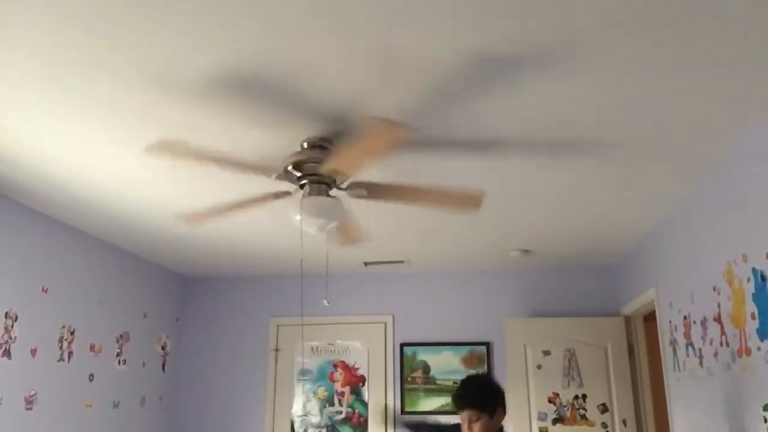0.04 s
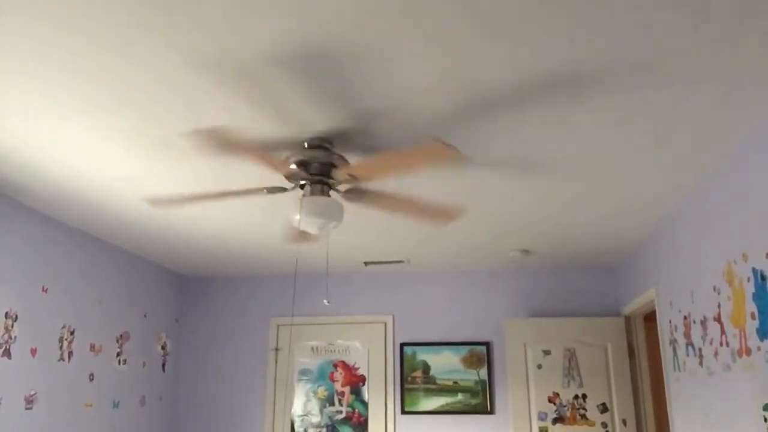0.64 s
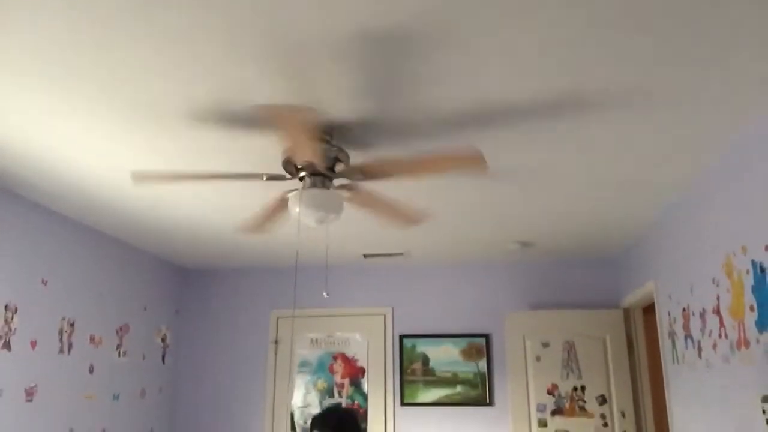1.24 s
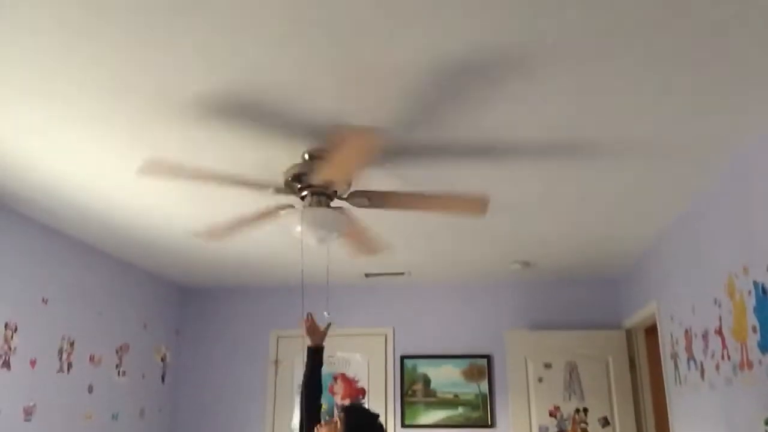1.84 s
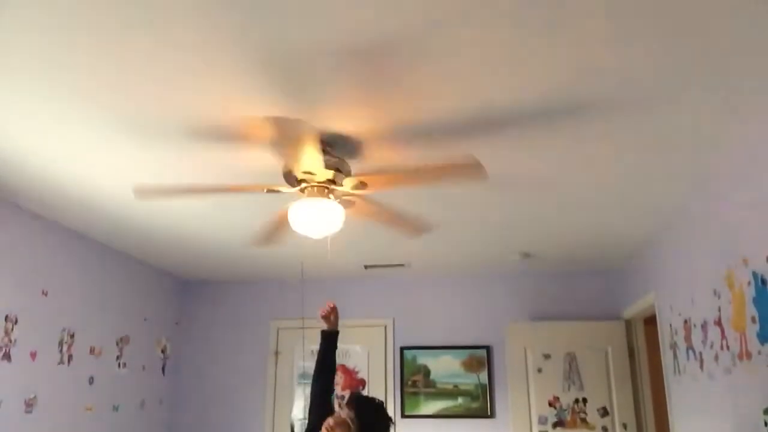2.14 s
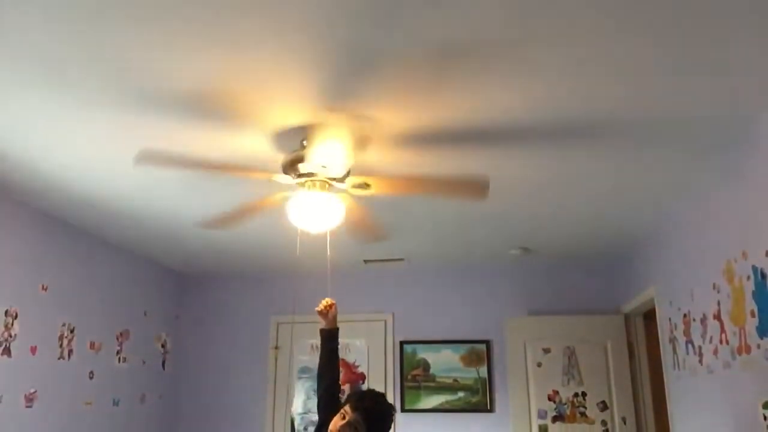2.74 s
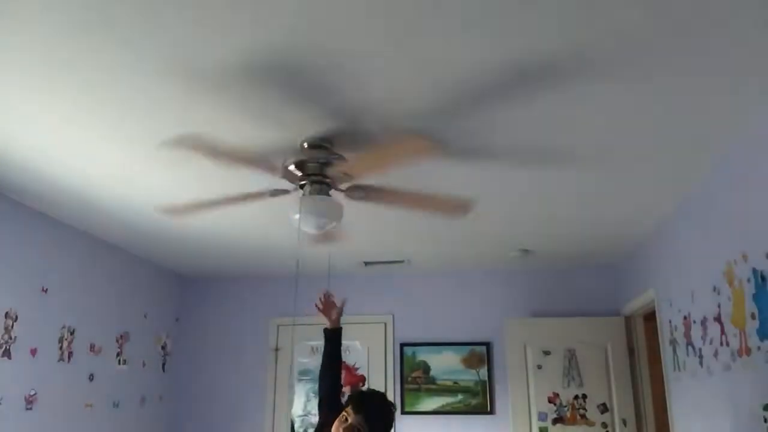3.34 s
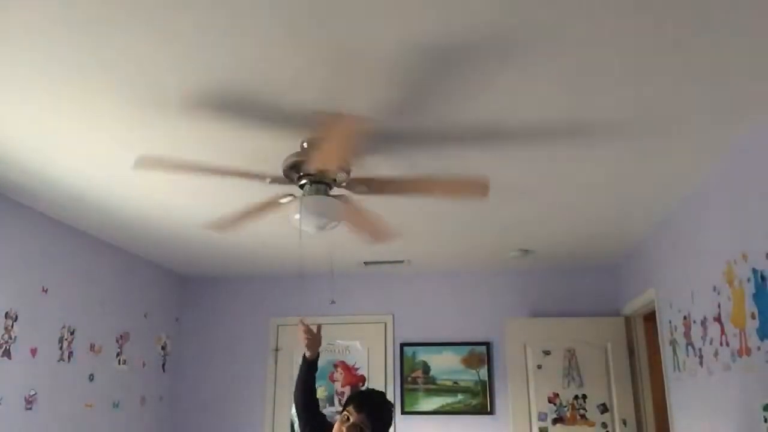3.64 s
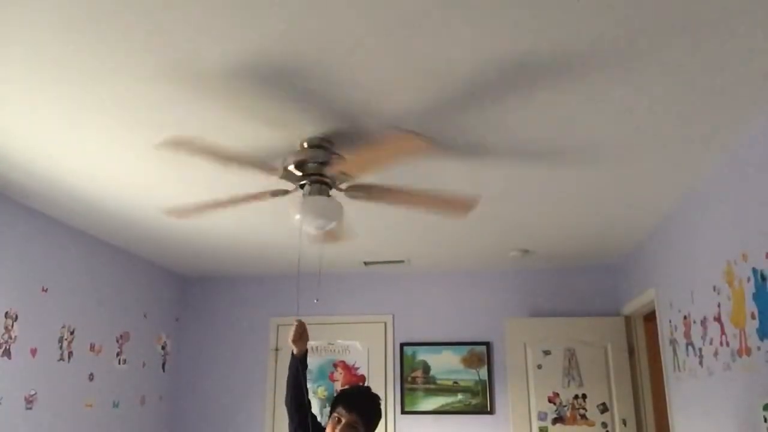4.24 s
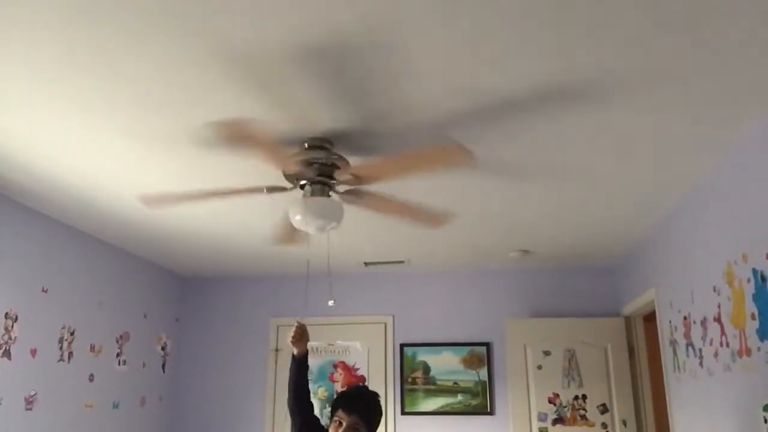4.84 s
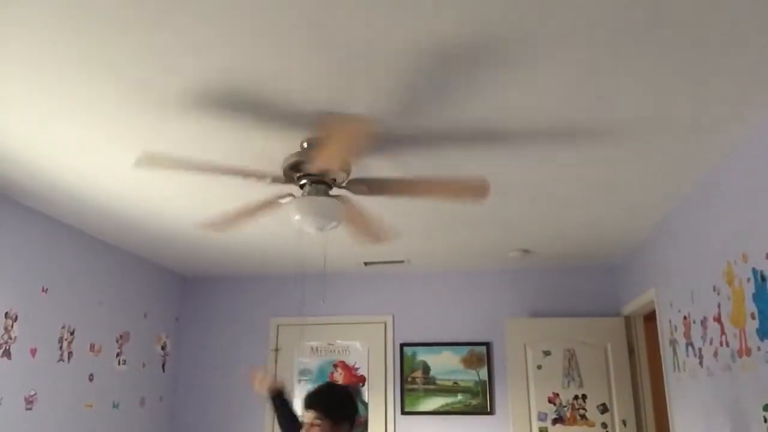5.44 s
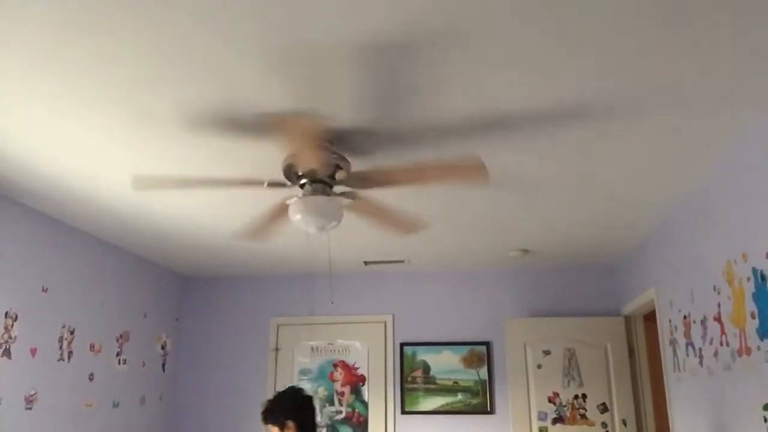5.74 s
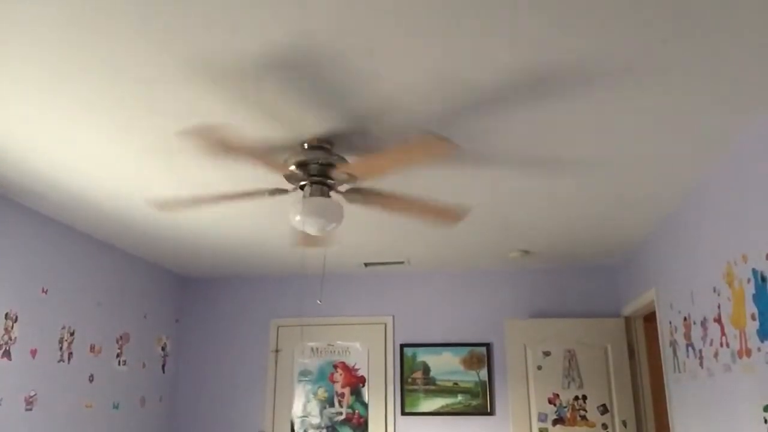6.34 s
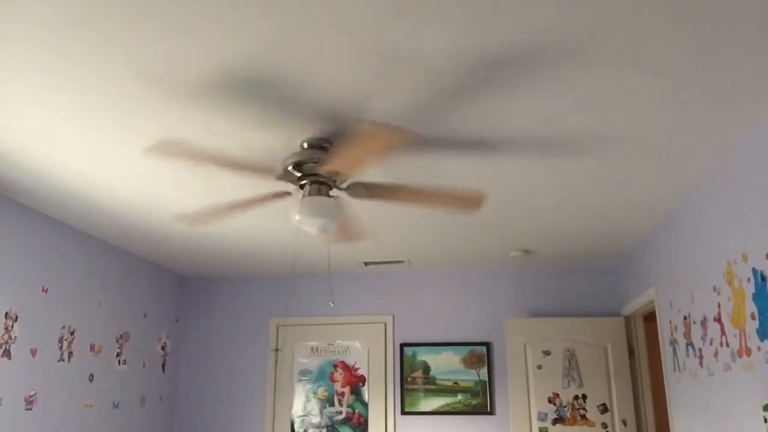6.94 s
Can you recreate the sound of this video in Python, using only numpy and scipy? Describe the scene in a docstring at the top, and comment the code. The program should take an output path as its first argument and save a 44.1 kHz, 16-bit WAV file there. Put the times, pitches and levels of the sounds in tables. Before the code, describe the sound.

Heavy footsteps thud, then a fan's bead chain jingles and its switch snaps repeatedly over a soft, steady rush of blades.

```python
"""A small bedroom with a ceiling fan turning. Someone steps down heavily, walks under it and tugs its
pull chains. The switches snap and ring the metal housing; the bead chains tick and jingle. Footfalls
thud in the floor, furniture is knocked and clothes rustle over the soft rush of the blades and the
motor hum. The microphone port rings near 8.5 kHz and gives every high sound the same glint."""
import sys
import numpy as np
from scipy import signal
from scipy.fft import rfft, irfft
from scipy.io import wavfile

SR = 44100
rng = np.random.default_rng(int(sys.argv[2]) if len(sys.argv) > 2 else 0)


def materialize(psi):
    """Save the field psi as 16-bit PCM at rate SR to the path in sys.argv[1].

    A 1-D psi becomes a single channel; in a 2-D psi each row is a channel.
    """
    bounded = np.clip(np.atleast_2d(psi).T, -1, 1)
    quanta = np.round(bounded * 32767).astype(np.int16)
    wavfile.write(sys.argv[1], SR, quanta)


N = 307804
TIME = np.arange(N) / SR
SHORT = TIME[:SR // 2]

# chain drawn tight, then a switch click; levels before gains:
# click_s, takeup_s, takeup_db, ping_db, crack_db, housing_db, canopy_db
CLICKS = [(2.218, .054, -59, -47, -45.5, -59, -47.5), (2.2466, 0.015, -48, -36, -35, -27.5, -35),
          (2.254, .005, -31.5, -40, -27, -46, -58), (2.439, 0.026, -57, -71, -58, -55, -56.5),
          (2.589, 0.057, -66, -39.5, -49.5, -48, -54), (2.976, 0.037, -60.5, -59, -54, -61, -78),
          (3.048, 0.04, -62, -24, -40.5, -35.5, -53.5), (3.192, .006, -54, -42, -48, -49, -62),
          (3.24, .01, -45, -18, -29, -38, -48.5), (3.396, .013, -38, -26, -29, -36.5, -56),
          (3.958, .055, -57, -28, -40.5, -34.5, -37.5), (4.089, 0.022, -42, -20, -38.5, -43, -45.5),
          (4.273, 0.031, -51.5, -61, -42, -57, -56.5), (4.29, .015, -60, -19, -26.5, -31, -57),
          (4.529, 0.016, -58.5, -31.5, -45.5, -49.5, -51.5), (4.644, 0.036, -42.5, -19, -33, -38.5, -43.5),
          (4.796, .005, -49.5, -43, -63, -40, -60), (4.845, .022, -44, -15, -26, -30.5, -47),
          (5.011, 0.0078, -49, -35, -45, -62, -44), (5.129, .054, -43.5, -21, -32, -37, -54),
          (5.271, 0.031, -43.5, -25.5, -30, -28.5, -49)]
# motor housing modes: pitch_hz, width_hz, gain_db
HOUSING_MODES = [(562, 196, -4.5), (743, 290, -8.5), (1403, 210, -6), (1667, 187, -1), (1915, 57, 3),
                 (2380, 300, -5), (2780, 180, 0.5), (2770, 78, -2), (3430, 590, -0.5), (3800, 460, 5),
                 (4680, 580, 7), (5370, 79, 6.5), (6520, 900, 2)]
# modes of the small metal parts of switch and chain: pitch_hz, width_hz, gain_db
FITTING_MODES = [(5760, 190, -21), (7090, 260, 4.5), (7740, 92, 7), (8100, 280, 4), (8766, 270, -0.5),
                 (8970, 157, 4.5), (11600, 470, -12)]


def from_db(db):
    return 10 ** (np.asarray(db) / 20)


def rms_one(x):
    return x / np.sqrt(np.mean(x ** 2) + 1e-20)


def energy_one(x):
    return x / np.sqrt(np.sum(x ** 2) + 1e-20)


def at_hz(points, hz):
    """Interpolate a table on a log-frequency axis."""
    known_hz, values = np.transpose(points)
    return np.interp(np.log(hz + 1e-9), np.log(known_hz), values)


def cut(x, hz, kind, order=2):
    """Causal low- or high-pass."""
    return signal.sosfilt(signal.butter(order, hz, kind, fs=SR, output="sos"), x + 1e-18)


def resonate(x, modes):
    """Parallel resonances with alternating signs."""
    out = 0
    for k, (hz, width_hz, db) in enumerate(modes):
        r = np.exp(-np.pi * width_hz / SR)
        poles = [1, -2 * r * np.cos(2 * np.pi * hz / SR), r * r]
        band = (1 - r * r) / 2 * signal.lfilter([1, 0, -1], poles, x + 1e-18)
        out = out + (-1) ** k * from_db(db) * band
    return out


def noise(spectrum):
    """Steady coloured noise, rms 1."""
    colour = from_db(at_hz(spectrum, np.fft.rfftfreq(N, 1 / SR)))
    return rms_one(irfft(rfft(rng.standard_normal(N)) * colour, N))


def drift(per_s):
    """Random wander, spread about 1."""
    return np.interp(TIME * per_s, np.arange(N), rng.standard_normal(N))


def add(out, start_s, sound):
    start = max(round(start_s * SR), 0)
    out[start:start + len(sound)] += sound[:max(N - start, 0)]


def movement(start_s, length_s, attack_s, release_s):
    """Envelope: linear attack, exponential release after length_s."""
    since_s = np.maximum(TIME - start_s, 0)
    return np.minimum(since_s / attack_s, 1) * np.exp(-np.clip((since_s - length_s) / release_s, 0, 20))


def grit(decay_s, rise_s=0.00019):
    """Rough contact: a noise burst that swells and dies."""
    burst = rng.standard_normal(len(SHORT)) * np.exp(-SHORT / decay_s)
    return burst * (1 - np.exp(-SHORT / rise_s)) ** 2


def push(peak_s):
    """Soft contact: one smooth hump of force."""
    return SHORT / peak_s * np.exp(-SHORT / peak_s)


def chatter(longest_s, stages=4, feedback=0.8):
    """Sharp blow, smeared by rebounds inside the mechanism (all-pass loops)."""
    blow = signal.unit_impulse(len(SHORT))
    for share in rng.uniform(.1, 1, stages):
        loop = np.r_[1, np.zeros(int(share * longest_s * SR)), feedback]
        blow = signal.lfilter(loop[::-1], loop, blow + 1e-18)
    return blow


def struck(blow, modes, spread_db, detune=0):
    """A blow excites each mode at a random strength; loose parts also shift in pitch. Energy 1."""
    draws = rng.standard_normal((len(modes), 2))
    varied = [(hz * (1 + detune * shift), width_hz, db + spread_db * strength)
              for (hz, width_hz, db), (strength, shift) in zip(modes, draws)]
    return energy_one(resonate(blow, varied))


def bedroom(x, wet_db, gap_s=.002, build_s=0.052, early_boost=0.67, early_s=0.0029):
    """Direct sound, strong echoes off the nearest surfaces, then a thickening tail; treble dies first."""
    # room decay: band_hz, t60_s
    decays = [(60, 0.42), (200, 0.41), (530, 0.4), (1400, 0.34), (3700, 0.23), (9000, 0.23), (16000, 0.11)]
    density = np.clip(.1 + (SHORT / build_s) ** 2, 0, 1)
    echoes = rng.standard_normal(len(SHORT)) * (rng.random(len(SHORT)) < density) / np.sqrt(density)
    echoes *= (SHORT > gap_s) * (1 + early_boost * np.exp(-SHORT / early_s))
    spectrum, hz = rfft(echoes), np.fft.rfftfreq(len(SHORT), 1 / SR)
    tail = 0
    for band_hz, t60_s in decays:
        share = at_hz([(f, f == band_hz) for f, _ in decays], hz)
        tail = tail + irfft(spectrum * share, len(SHORT)) * from_db(-60 * SHORT / t60_s)
    return x + from_db(wet_db) * signal.fftconvolve(x, energy_one(tail))[:len(x)]


def fan(air_db=-52.5, blades_per_s=12, swell=0.037, eddy_db=1):
    """Air rushes off the blades, swelling as each passes; the motor hums at mains multiples."""
    # blade rush spectrum: freq_hz, relative_db
    air_spectrum = [(22, -39), (50, 4.5), (90, 0), (120, -0.5), (200, -8), (300, -13.5), (480, -26.5),
                    (700, -28.5), (1000, -31.5), (1700, -34.5), (3000, -40.5), (8000, -41.5), (15000, -43)]
    # motor hum: pitch_hz, rms_db
    harmonics = [(60, -74), (120, -59.5), (180, -71.5)]
    passing = 1 + swell * np.sin(2 * np.pi * blades_per_s * TIME)
    air = noise(air_spectrum) * passing * from_db(air_db + eddy_db * drift(per_s=3.9))
    hum = sum(np.sqrt(2) * from_db(db) * np.sin(2 * np.pi * (hz * TIME + rng.random()))
              for hz, db in harmonics)
    return air + hum


def clothes(rub_gain_db=-5, swish_gain_db=-9, stir_db=-68, flutter_db=3):
    """Cloth rubs in small uneven slips, with a dry swish on top."""
    # brushes of cloth as the body moves: start_s, length_s, rub_db, swish_db
    brushes = [(0.03, 0.15, -55, -56.5), (0.116, 0.12, -45, -59.5), (0.232, 0.16, -46, -59),
               (0.327, 0.034, -52, -57), (0.518, 0.073, -56, -61), (0.592, 0.083, -54, -60),
               (0.763, 0.016, -49, -55), (0.992, 0.011, -50.5, -50.5), (1.02, 0.067, -68, -62.5),
               (1.169, 0.071, -58.5, -62), (1.32, 0.042, -59.5, -60.5), (1.579, .03, -65, -57.5),
               (5.714, 0.011, -83, -54), (6.01, 0.15, -65, -60), (6.206, 0.073, -56, -51),
               (6.29, 0.035, -45.5, -47), (6.524, 0.029, -51, -64), (6.645, 0.021, -80, -60),
               (6.785, 0.022, -66, -70)]
    # faint stirring while walking: start_s, length_s
    walks = [(0, 1.68), (5.698, 1.1)]
    # rub spectrum: freq_hz, relative_db
    rub_spectrum = [(200, 10), (450, 4), (800, 1.5), (1600, -3), (2600, -10), (4000, -12), (8000, -16),
                    (15000, -24)]
    # swish spectrum: freq_hz, relative_db
    swish_spectrum = [(1500, -59), (4500, -1.5), (8000, 8.5), (11000, -1.5), (15000, -10)]
    stir = sum(movement(start_s, length_s, attack_s=0.01, release_s=0.23) for start_s, length_s in walks)
    rubbing = swishing = from_db(stir_db) * stir
    for start_s, length_s, rub_db, swish_db in brushes:
        brush = movement(start_s, length_s, attack_s=0.47 * length_s, release_s=0.013)
        rubbing = np.hypot(rubbing, from_db(rub_db) * brush)
        swishing = np.hypot(swishing, from_db(swish_db) * brush)
    rub = noise(rub_spectrum) * rubbing * from_db(rub_gain_db)
    swish = noise(swish_spectrum) * swishing * from_db(swish_gain_db)
    return (rub + swish) * from_db(flutter_db * drift(per_s=120))


def furniture(tap_gain_db=22, ring_gain_db=28):
    """A dull tap on wood leaves a hollow ring."""
    # light knocks: start_s, tap_db, ring_db
    knocks = [(0.304, -45.5, -38), (0.335, -43, -34), (0.36, -54, -28.5), (0.434, -43, -47),
              (0.777, -49.5, -41), (0.995, -53.5, -70), (1.345, -66, -77), (6.316, -61, -58),
              (6.539, -53, -67)]
    # short-lived wood modes: pitch_hz, width_hz, gain_db
    tap_modes = [(506, 43, 0), (758, 43, 0), (1010, 140, -4.5), (1420, 380, -7), (1680, 280, -4),
                 (2540, 150, -5.5), (4450, 1800, -18)]
    # furniture body modes: pitch_hz, width_hz, gain_db
    ring_modes = [(335, 8, 0), (385, 20, -15), (535, 30, -13), (750, 25, -16)]
    out = np.zeros(N)
    for start_s, tap_db, ring_db in knocks:
        tap = bedroom(energy_one(resonate(grit(decay_s=0.0012), tap_modes)), wet_db=0.5)
        ring = energy_one(resonate(push(peak_s=0.00063), ring_modes))
        add(out, start_s, from_db(tap_db + tap_gain_db) * tap + from_db(ring_db + ring_gain_db) * ring)
    return out


def footsteps(boom_gain_db=28, knock_gain_db=25.5):
    """Each footfall heaves the whole floor and knocks its boards."""
    # footfalls and shifts of weight: start_s, boom_db, knock_db
    steps = [(0.171, -40, -33.5), (0.248, -39, -23), (0.31, -26.5, -24.5), (0.367, -19.5, -24.5),
             (0.411, -22.5, -39), (0.486, -31, -38), (0.571, -38, -37.5), (0.784, -39, -44),
             (0.826, -35, -53), (0.995, -36.5, -38), (1.061, -45.5, -64), (2.235, -40, -40.5),
             (3.199, -43, -48), (3.971, -46, -42), (4.101, -30, -42), (4.645, -35, -36),
             (5.041, -35.5, -35.5), (5.139, -32.5, -33.5), (5.209, -33.5, -43), (6.124, -31, -37),
             (6.146, -24.5, -40), (6.579, -43.5, -36), (6.956, -27.5, -31.5)]
    # board and whole-floor modes: pitch_hz, width_hz, gain_db
    board_modes = [(111.5, 22.7, -0.5), (169.6, 26, 0.5), (175.4, 17.7, 0.5), (220.7, 34.6, -11)]
    floor_modes = [(55, 30, 0), (88, 40, -8)]
    out = np.zeros(N)
    boom = energy_one(resonate(push(peak_s=0.002), floor_modes))
    for start_s, boom_db, knock_db in steps:
        knock = energy_one(resonate(grit(decay_s=0.031, rise_s=0.0012), board_modes))
        add(out, start_s, from_db(boom_db + boom_gain_db) * boom)
        add(out, start_s, from_db(knock_db + knock_gain_db) * knock)
    return out


def chain_motion(tighten_db=6, shiver_gain_db=-30):
    """Envelopes of the chain: drawn tight before each click, shivering after it, swinging when slack."""
    # swings of the slack chain: start_s, length_s, level_db
    swings = [(3.51, 0.41, -60), (3.749, 0.11, -51), (4.01, 0.1, -48), (4.532, 0.043, -47.5),
              (4.956, 0.15, -53), (5.38, 0.18, -52.5)]
    drawn = shiver = 0
    for click_s, takeup_s, takeup_db, ping_db, *_ in CLICKS:
        slack = np.clip((click_s - TIME) / takeup_s, 0, 1)
        pull = movement(click_s - takeup_s, takeup_s, attack_s=1 / SR, release_s=0.009)
        drawn += from_db(takeup_db + tighten_db * (.5 - slack)) * pull
        shiver += from_db(ping_db + shiver_gain_db) * movement(click_s, 0, attack_s=0.017, release_s=.11)
    swing = sum(from_db(db) * movement(start_s, length_s, attack_s=0.046, release_s=0.022)
                for start_s, length_s, db in swings)
    return drawn, shiver, swing


def chain(ticks_per_s=170, beads=8, size_spread_db=5, catch_db=28, catch_lag_s=.0015,
          jingle_db=-9.5, tinkle_db=-14, brush_db=-18, drag_db=-24.5, drag_exponent=0.68):
    """Beads tick on each other, the fittings and, in the eyelet, the housing; each has its own ring."""
    drawn, shiver, swing = chain_motion()
    shaking = drawn + np.hypot(shiver, swing)
    friction = from_db(drag_db) * drawn ** drag_exponent + from_db(brush_db) * shiver
    sizes = from_db(size_spread_db * np.minimum(rng.exponential(1, N), 3)) * rng.choice([-1, 1], N)
    ticks = rms_one(sizes * (rng.random(N) < ticks_per_s / SR))
    for click_s, takeup_s, *_ in CLICKS:   # each take-up starts with one bead catching
        add(ticks, click_s - takeup_s + catch_lag_s, from_db([catch_db]))
    out, bead_of_tick = 0, rng.integers(0, beads, N)
    for bead in range(beads):
        blow = chatter(longest_s=.0005)
        jingle = from_db(jingle_db) * energy_one(cut(blow, 6900, "high", order=5))
        tinkle = from_db(tinkle_db) * struck(blow, FITTING_MODES, spread_db=6, detune=0.028)
        drag = energy_one(cut(struck(blow, HOUSING_MODES, spread_db=6), 3300, "low", order=1))
        own_ticks = ticks * (bead_of_tick == bead)
        out += signal.oaconvolve(own_ticks * shaking, jingle + tinkle)
        out += signal.oaconvolve(own_ticks * friction, drag)
    return bedroom(out[:N], wet_db=3.5)


def switches(ping_gain_db=10, crack_gain_db=24, housing_gain_db=18.5, canopy_gain_db=24,
             firm_db=-35, scrape_range_db=14):
    """The ratchet cracks over; the blow rings fittings and housing and jolts the canopy."""
    # ceiling canopy modes: pitch_hz, width_hz, gain_db
    canopy_modes = [(131, 13, -15), (192.4, 36.5, 1.5), (251, 58, -9), (330, 31, -7)]
    jolt = energy_one(resonate(push(peak_s=0.00065), canopy_modes))
    out = np.zeros(N)
    for click_s, _, _, ping_db, crack_db, housing_db, canopy_db in CLICKS:
        # firm pull: one clean snap; light pull: mostly beads scraping past the catch
        scrape_share = np.clip((firm_db - crack_db) / scrape_range_db, .03, .9)
        snap = chatter(longest_s=.0008)
        scrape = energy_one(grit(decay_s=0.0074, rise_s=0.00031))
        blow = np.sqrt(1 - scrape_share) * snap + np.sqrt(scrape_share) * scrape
        crack = from_db(crack_db + crack_gain_db) * energy_one(cut(blow, 5350, "high"))
        ping = from_db(ping_db + ping_gain_db) * struck(blow, FITTING_MODES, spread_db=3, detune=0.021)
        housing = from_db(housing_db + housing_gain_db) * struck(blow, HOUSING_MODES, spread_db=3)
        canopy = from_db(canopy_db + canopy_gain_db) * jolt
        # each click rings out in the room with freshly drawn random echoes
        add(out, click_s, bedroom(crack + ping + housing + canopy, wet_db=2))
    return out


def scene():
    """Mono mix: switches and chain carry across the room; footfalls and clothes are drier."""
    person = bedroom(footsteps(), wet_db=-9.5) + bedroom(clothes(), wet_db=-3.5)
    return (switches() + chain() + furniture() + person + fan())[None]


def record(dry, port_hz=8505, port_width_hz=675, port_db=9.9, bottom_hz=51, top_hz=15900):
    """The microphone port rings; the deepest bass and the top are cut."""
    ringing = dry + resonate(dry, [(port_hz, port_width_hz, port_db)])
    lean = cut(ringing, bottom_hz, "high", order=3)
    return signal.sosfilt(signal.ellip(10, .1, 70, top_hz, fs=SR, output="sos"), lean)


dry = scene()
out = record(dry)
materialize(out)
```